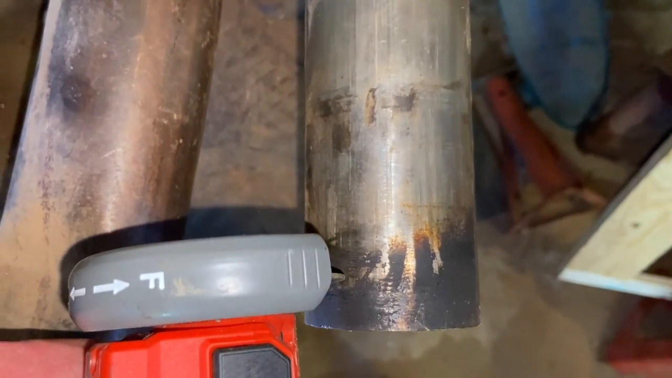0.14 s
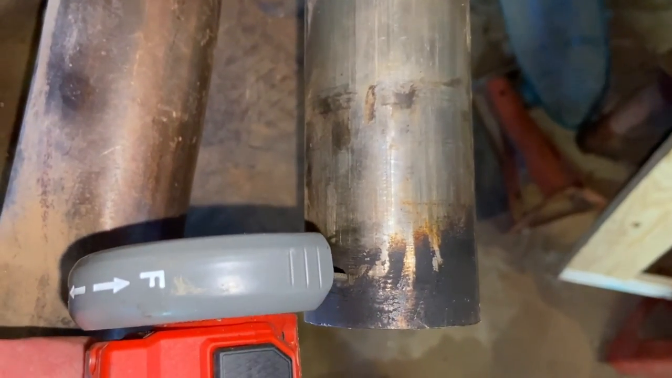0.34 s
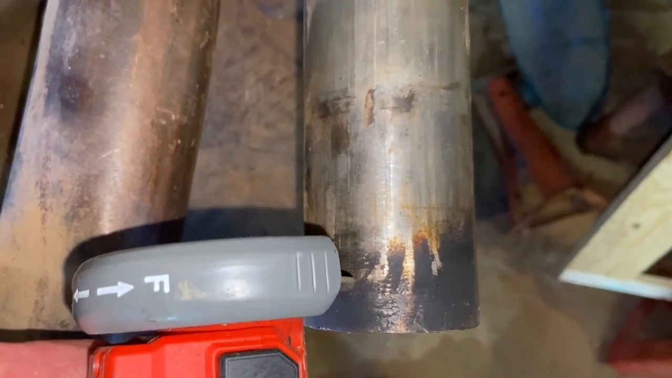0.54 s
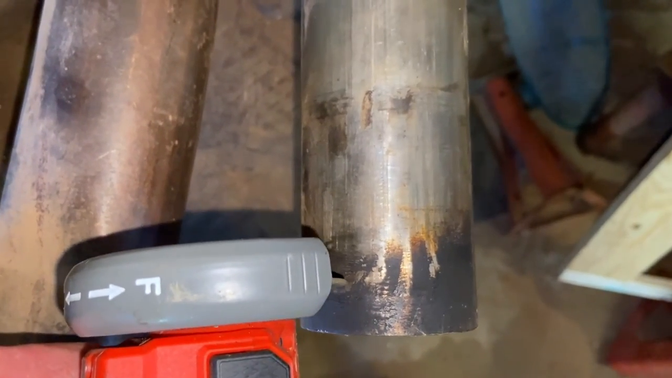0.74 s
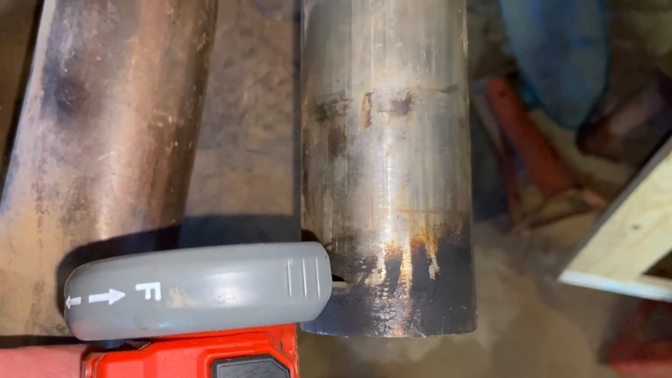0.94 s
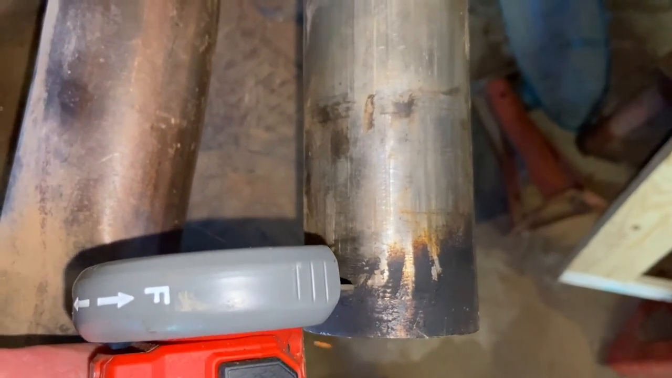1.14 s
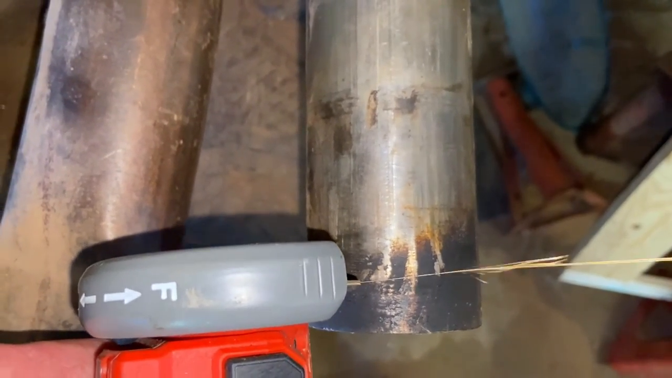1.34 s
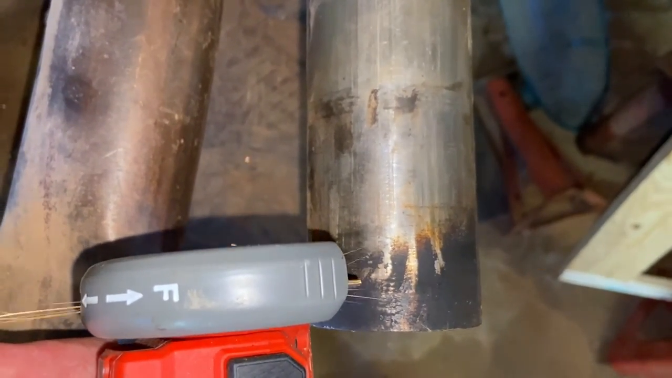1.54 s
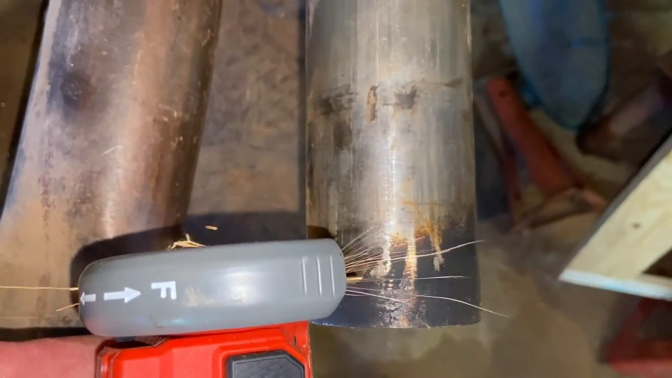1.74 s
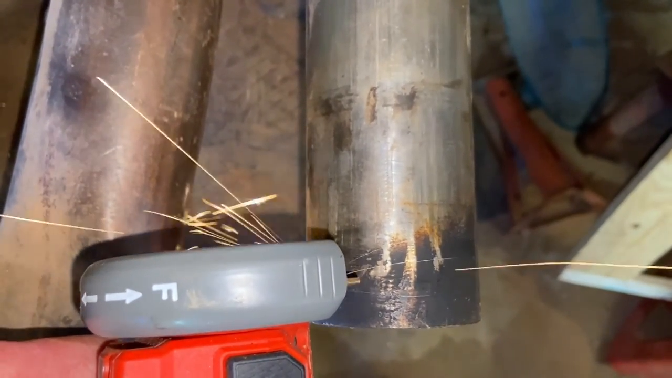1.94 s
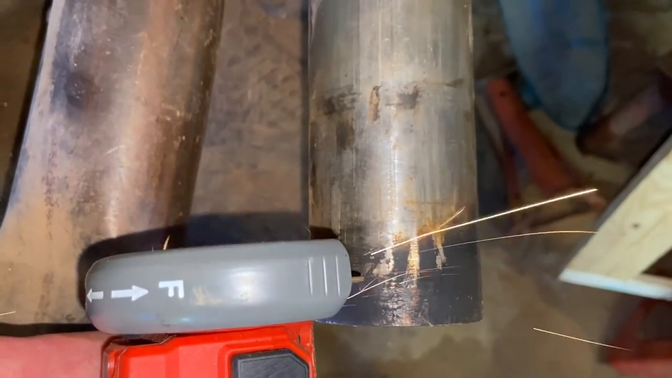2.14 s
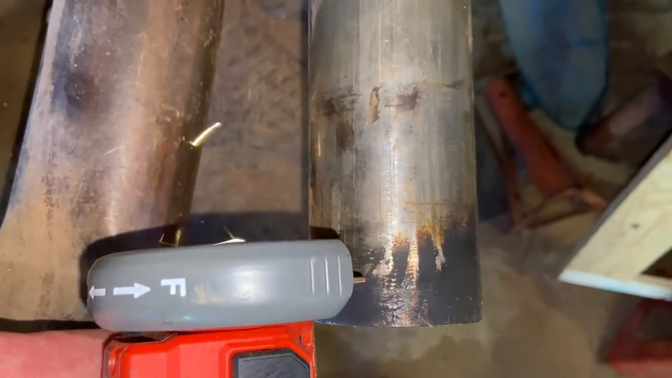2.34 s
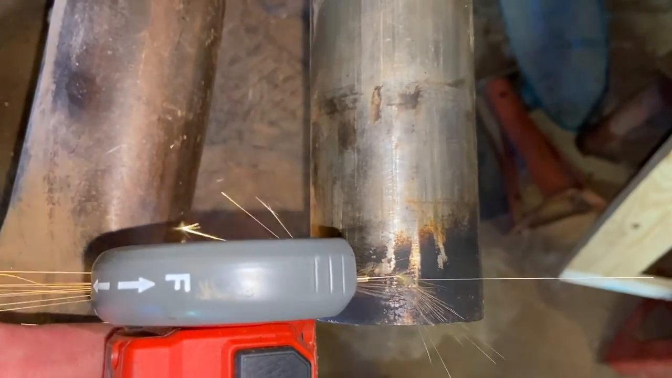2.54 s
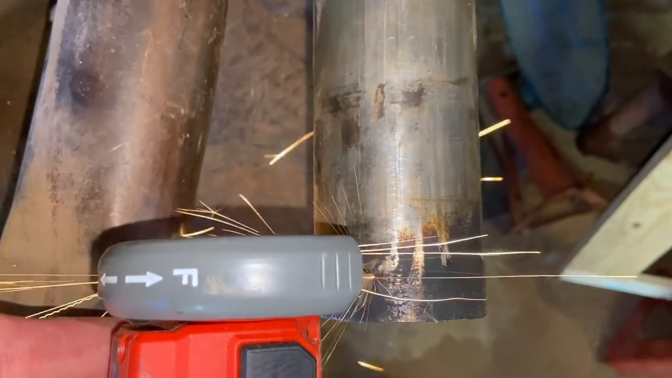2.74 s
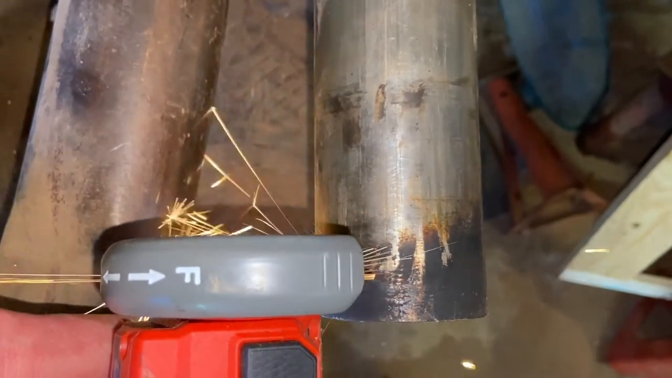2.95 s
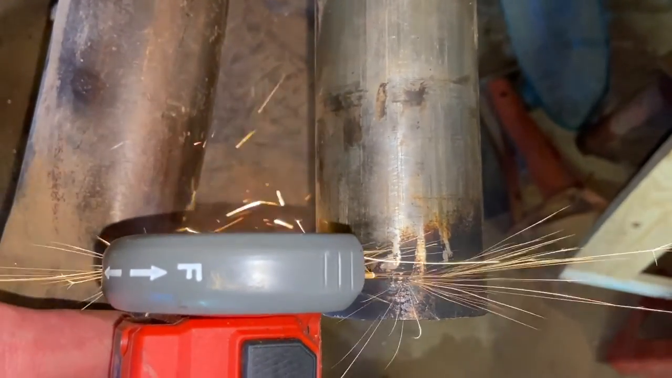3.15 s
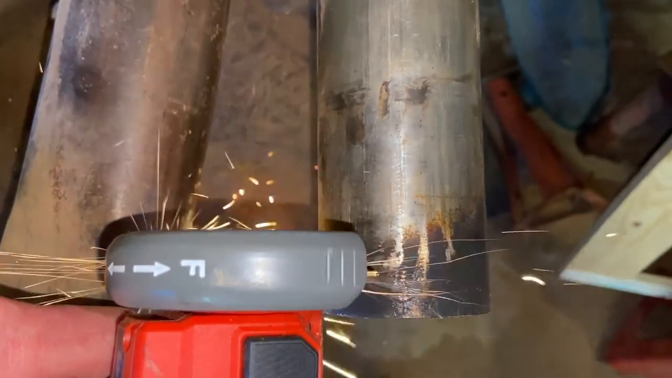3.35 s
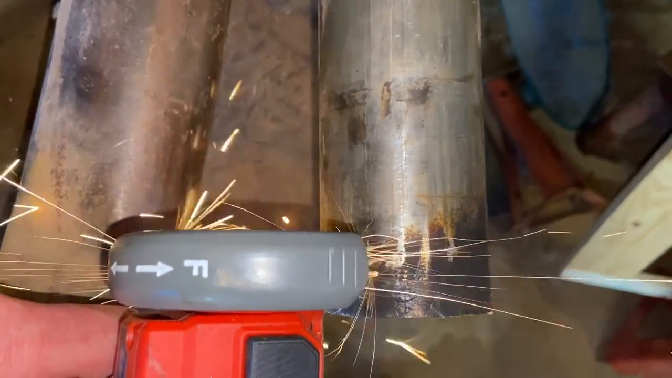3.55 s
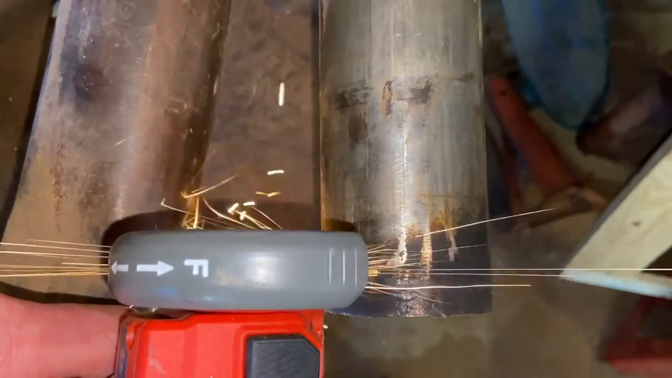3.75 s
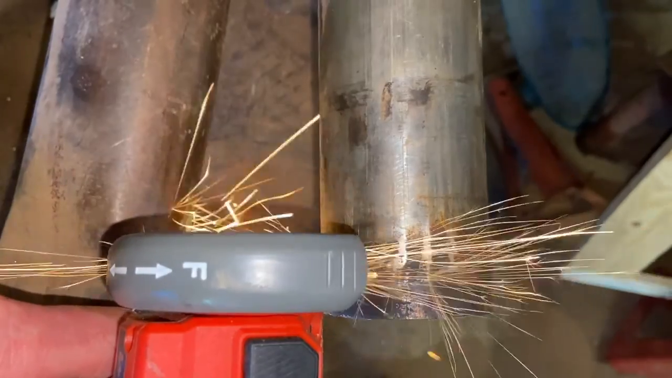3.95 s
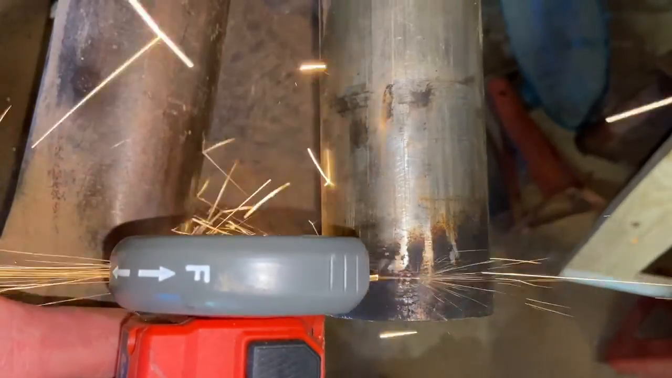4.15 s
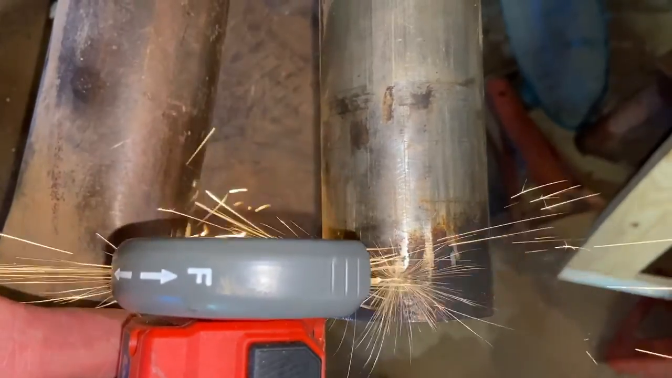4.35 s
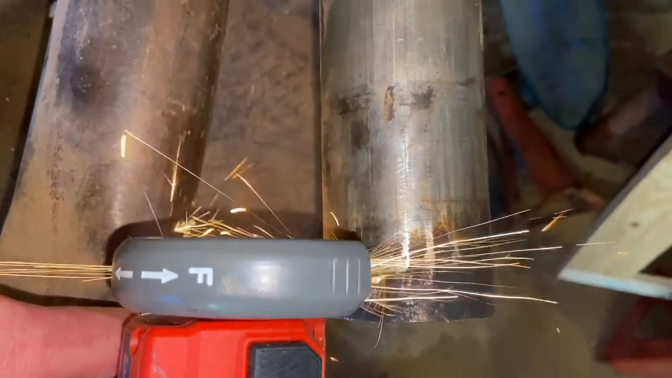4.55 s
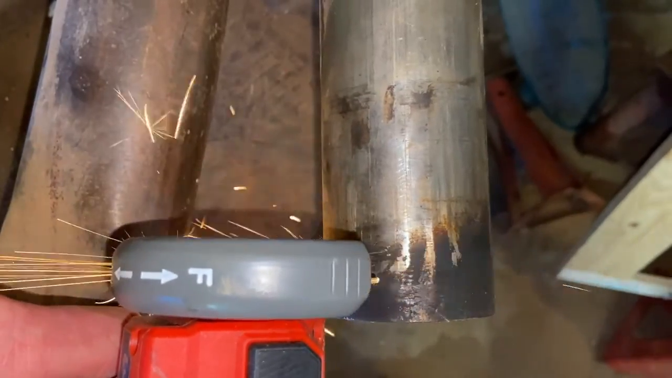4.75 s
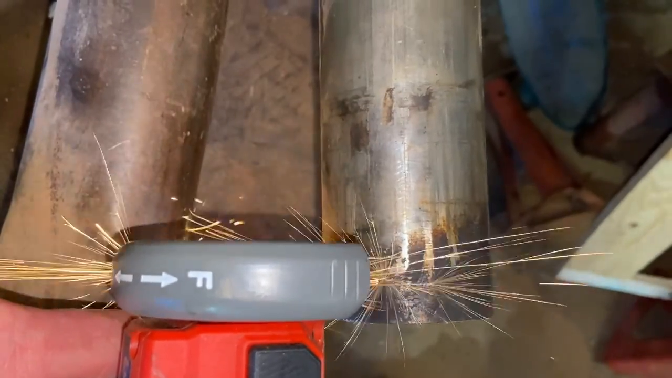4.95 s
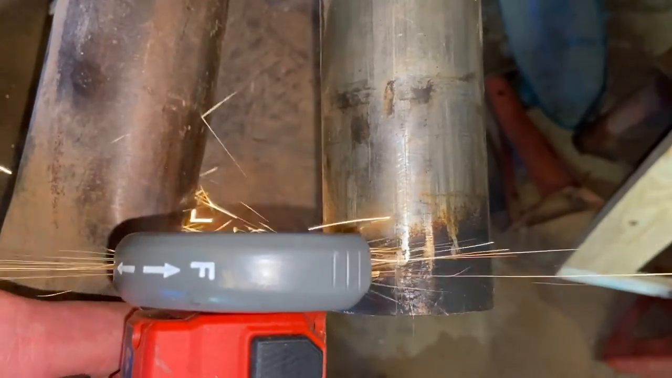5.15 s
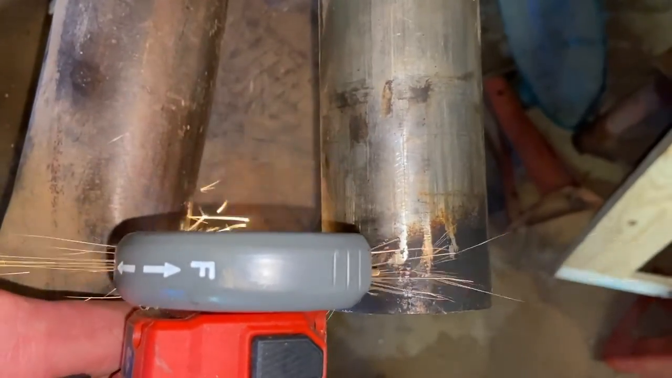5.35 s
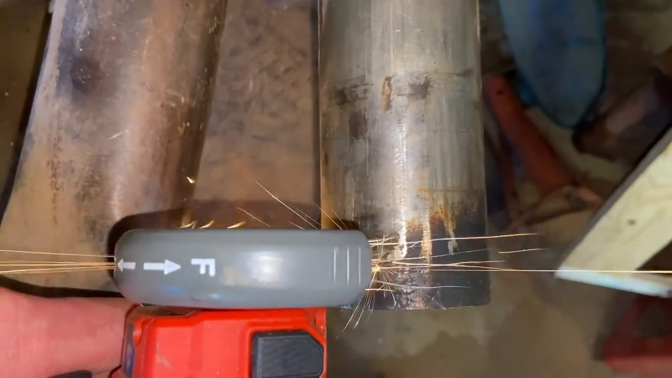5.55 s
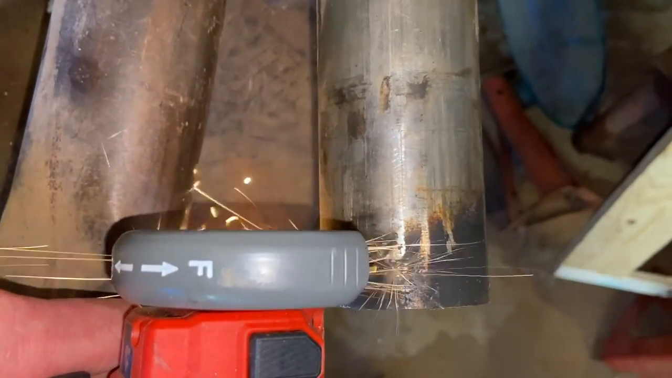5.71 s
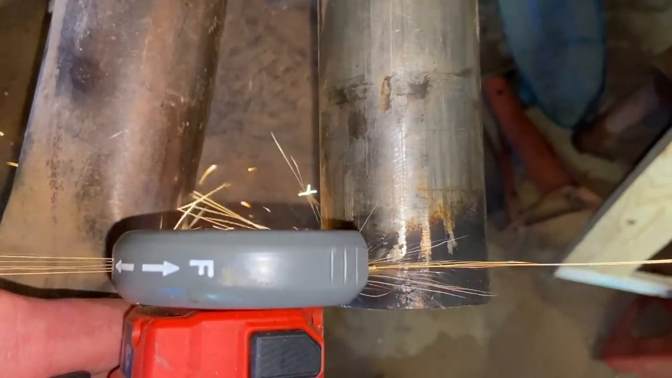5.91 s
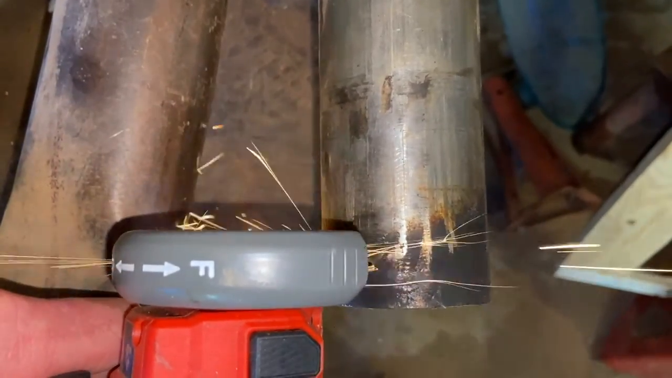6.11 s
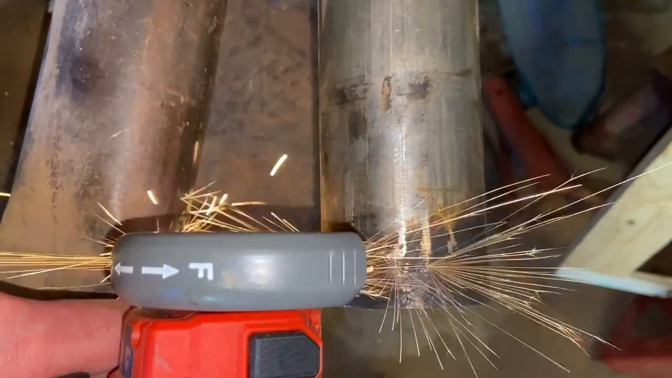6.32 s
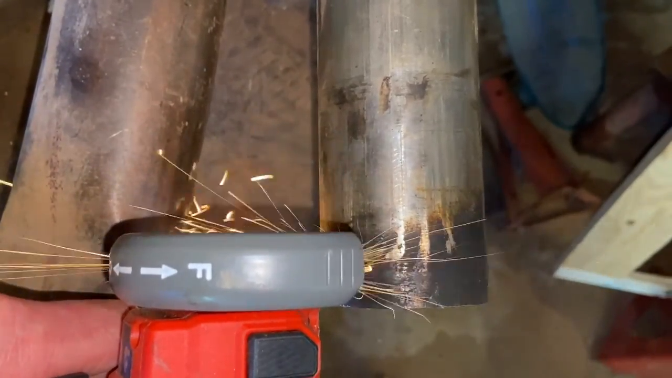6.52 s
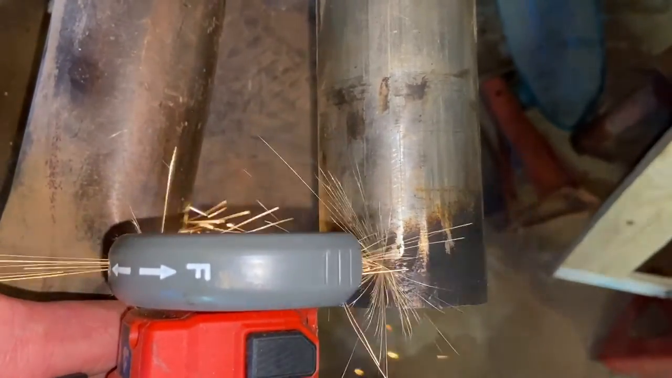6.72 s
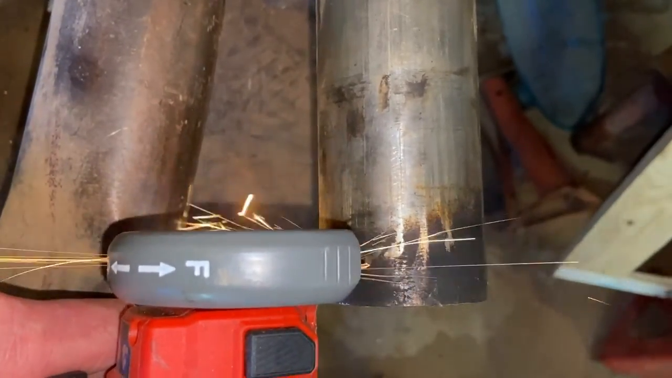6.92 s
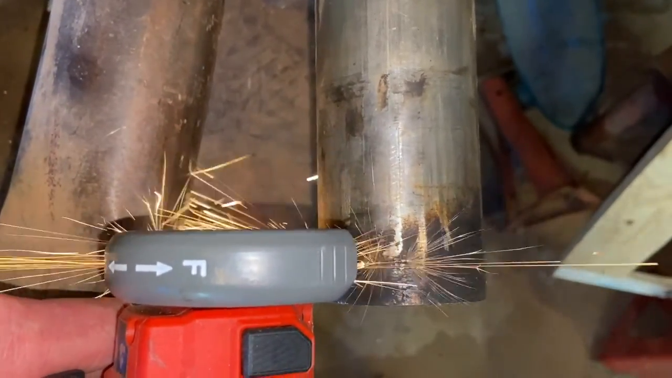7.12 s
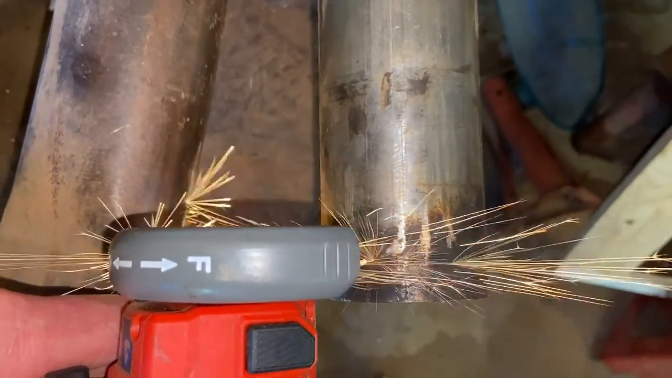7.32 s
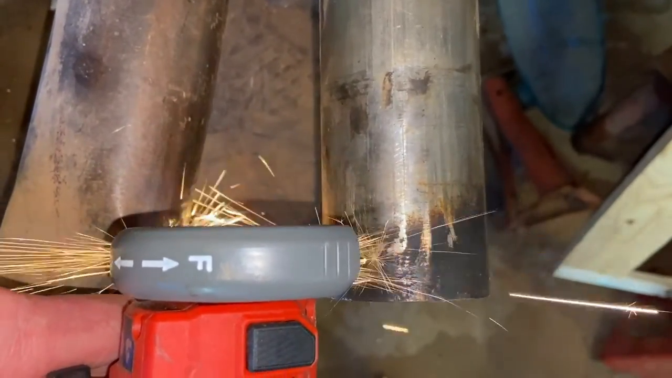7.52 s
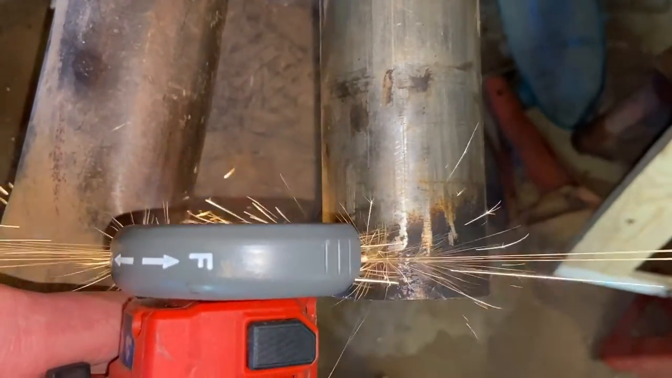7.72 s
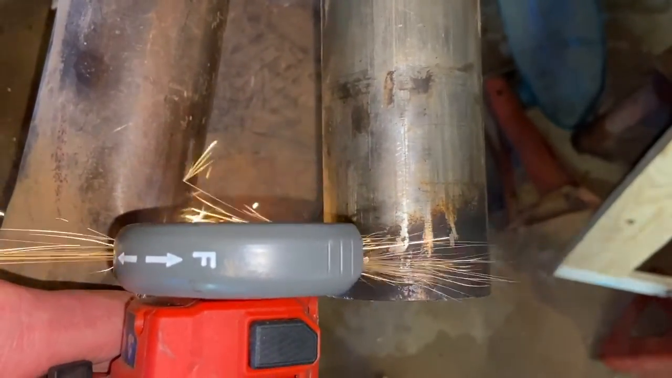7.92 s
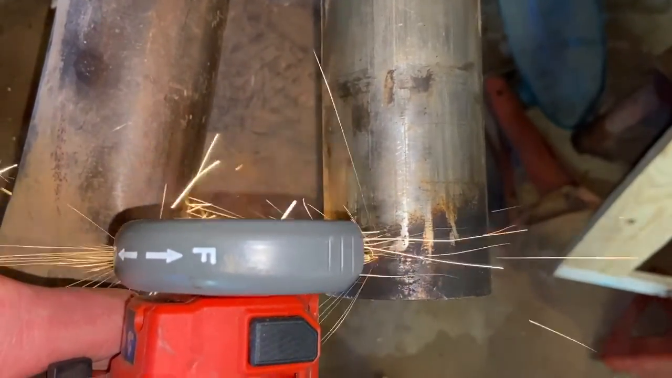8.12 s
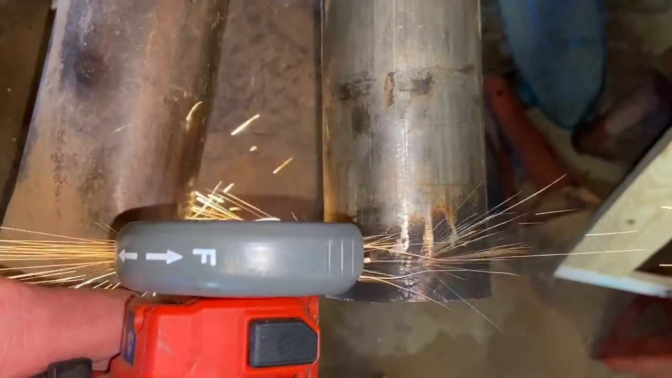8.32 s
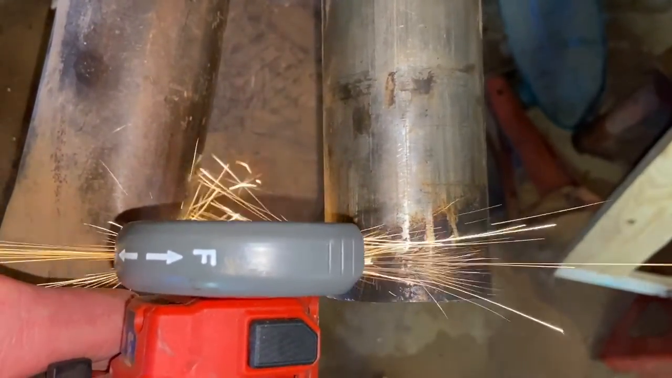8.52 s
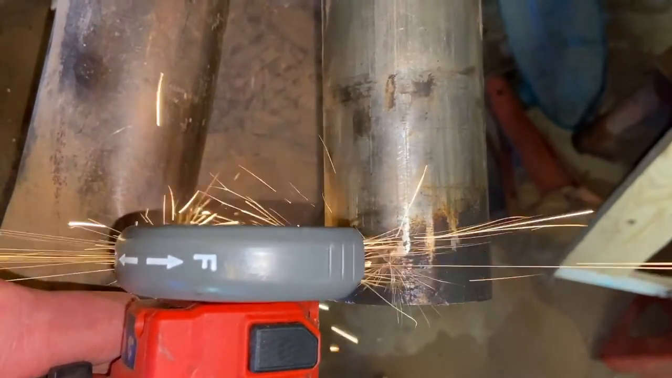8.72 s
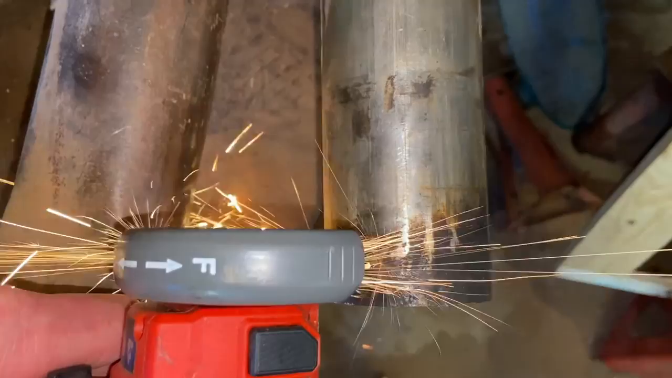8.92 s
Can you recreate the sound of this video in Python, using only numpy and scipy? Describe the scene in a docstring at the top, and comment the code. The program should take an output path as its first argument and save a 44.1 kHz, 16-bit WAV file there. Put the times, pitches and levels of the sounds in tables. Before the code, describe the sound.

A cordless cut-off tool chirps and rattles to life against a steel pipe, then whines into a bright buzzing, hissing cut with ringing squeals.

```python
"""A whistle and a rattle lead into a bright buzz with hissing grit and clear singing tones from a steel pipe.
A cordless cut-off tool starts with its wheel resting on the pipe in a vise, then speeds up and cuts.
The buzz adds up multiples of the wheel's turning speed, which sags under load; the grit is coloured noise.
Narrow resonances and sine tones make the pipe ring; a motor, a fan, rumble and a short room tail join in."""
import sys
import numpy as np
from scipy import signal
from scipy.fft import rfft, irfft, next_fast_len
from scipy.io import wavfile

SR = 44100
rng = np.random.default_rng(int(sys.argv[2]) if len(sys.argv) > 2 else 0)


def dump_mix(stems):
    """Bounce the given channels to the path in sys.argv[1] as a 16-bit WAV at rate SR."""
    frames = np.atleast_2d(stems).T  # one column per channel
    limited = np.clip(frames, -1, 1)  # hard clip at full scale
    pcm = np.round(limited * 32767).astype(np.int16)
    wavfile.write(sys.argv[1], SR, pcm)


N = 395577

# Table levels are starting levels: later gains and resonances still act on them.
# Running speed under load. Each row: time in seconds, speed in turns per second.
RUNNING_SPEED = [(0.8, 291.4), (1.0, 295), (1.13, 289.3), (1.42, 288.2), (1.74, 285.6), (1.98, 280.3),
                 (2.32, 276.9), (2.79, 274.2), (3.3, 273.5), (3.5, 274.8), (4.17, 272.8), (4.52, 274),
                 (4.85, 281.4), (5.05, 283.8), (5.26, 281.9), (5.44, 283.9), (5.66, 282), (6.03, 279.5),
                 (6.18, 283.0), (6.62, 278), (6.87, 282.4), (7.07, 280.9), (7.58, 284.5), (7.81, 278.2),
                 (8.13, 275.4), (8.35, 276.6), (8.56, 272.8), (8.75, 275.4), (8.97, 272.2)]
# How hard the wheel rubs. Each row: time in seconds, buzz in dB, treble against the buzz in dB.
RUBBING = [(0.88, -29.5, -2.5), (1.25, -26, -2), (1.5, -28, -1.3), (1.95, -26.5, -5.5), (2.3, -30.5, -1.5),
           (2.9, -29, -2), (3.5, -27.5, -5), (3.7, -29, -2.5), (4.4, -28.5, -2.5), (4.72, -29, -2.5),
           (4.89, -33.5, -2), (5.05, -29, -2.5), (5.45, -28, -2.5), (5.68, -28.5, -2), (6.02, -30.5, -2.5),
           (6.15, -33, -5), (6.55, -32, -3.5), (6.9, -33, -4.5), (7.3, -29, 0.5), (7.6, -30.5, 0),
           (7.9, -30.5, -3.5), (8.15, -31.0, -1), (8.6, -31, -1.5), (8.97, -28.5, -0.5)]
# The wheel knocks on the pipe as it starts. Each row: time in seconds, level in dB.
KNOCKS = [(0.242, -15.5), (0.255, -11), (0.273, -9.5), (0.319, -23), (0.454, -25)]
# Motor tones. Each row: multiple of the turning speed, level in dB.
MOTOR_ORDERS = [(1, -60), (2, -57.5), (4, -50), (5, -53), (8, -52), (11, -54.5), (16, -52.5), (20, -55),
                (24, -69), (32, -55.5)]
# Pipe resonances. Each row: pitch in Hz, width in Hz, lift in dB.
PIPE_MODES = [(2795, 26, 17.5), (5316, 17.4, 18)]
# Resonances of the motor housing. Each row: pitch in Hz, width in Hz, lift in dB.
HOUSING_MODES = [(3220, 32, 24), (3790, 640, 27)]
# One stroke of the wheel. Each entry: level in dB against the buzz, for multiples 1, 2, 3.. of the speed.
STROKE_LEVELS = [-32, -35, -34.5, -28, -22, -23.5, -24.5, -23, -26, -20, -20, -17, -19, -16, -25.5, -12,
                 -10, -9, -10, -8.5, -9.5, -9, -16, -11.5, -16, -13.5, -15, -15, -16.5, -17, -16, -12, -24,
                 -20.5, -18.5, -19.5, -18.5, -25.5, -22.5, -21, -18.5, -16, -20.5, -18.5, -18, -22, -14.5,
                 -15, -15, -16, -23, -20, -18, -14, -13, -13, -14]
# Colour of the grit hiss. Each row: frequency in Hz, relative level in dB per Hz.
GRIT_COLOUR = [(300, -10), (1400, -5.5), (2400, -13.5), (3600, 4), (4300, 1), (5500, 3.5), (7000, -1.5),
               (8000, -1.5), (9800, -2.5), (11000, -10), (15600, -22)]
# Colour of the skidding scrape. Each row: frequency in Hz, relative level in dB per Hz.
SCRAPE_COLOUR = [(150, -34), (700, -10), (2400, -13), (3700, 5), (4500, -3.5), (5800, 7), (6800, -3),
                 (8200, 0), (9800, -8.5), (11000, -11), (15600, -3.5)]
# Colour of the starting thud. Each row: frequency in Hz, relative level in dB per Hz.
THUD_COLOUR = [(50, -33), (130, 2.5), (250, 2), (500, 3.5), (1500, 3.5), (3000, -1.5), (8000, -27)]
# Colour of the handling rumble. Each row: frequency in Hz, relative level in dB per Hz.
RUMBLE_COLOUR = [(20, -19), (50, 5.5), (75, 3.5), (110, -13), (250, -24), (1000, -49)]
# Colour of the room air. Each row: frequency in Hz, relative level in dB per Hz.
AIR_COLOUR = [(30, -13), (150, -4.5), (900, -8), (3000, -21), (16000, -41)]
# Timing at two microphone ports. Each row: frequency in Hz, left's lead in radians.
PORT_PHASE = [(0, -1), (550, 1.76), (1100, 1.32), (1400, 1.5), (1950, 1.48), (2250, 4), (2800, 2.5),
              (3050, 3), (3600, 0.5), (4150, 0.54), (4400, 0), (4750, 1.41), (6100, 1.61), (7100, -0.35),
              (9150, -3), (10600, -6), (11400, -6.5), (13300, -9.5), (15200, -12)]
# Balance of the two ports. Each row: frequency in Hz, left minus right in dB.
PORT_BALANCE = [(300, -0.5), (600, 7), (1300, 2), (2400, 4), (5300, 2), (6200, 5.5), (8000, 0), (15000, 0)]
# How alike noise is in the two channels. Each row: frequency in Hz, likeness (1 is identical).
LIKENESS = [(60, 0.96), (300, 0.93), (700, 0.21), (3000, 0.22), (8000, 0.99), (15000, 0.87)]
# Resonances of wheel, guard and vise. Each row: pitch in Hz, width in Hz, lift in dB.
GUARD_MODES = [(1160, 16, -2.5), (2017, 37, 2.5), (2320, 26, 1.5), (2512, 47, 14), (3030, 18, 3),
               (3230, 15.4, 13.5), (4827, 51, -4), (5526, 72, 1.5), (6025, 50, 6.5), (7110, 60, 3),
               (7790, 150, 8.5), (8510, 30.8, 22.5), (9590, 23, 2), (9826, 77, 6), (9955, 142, 12.5),
               (10940, 93, 8.5), (12430, 53, 21), (12400, 45, 8)]
# Squeal of the pipe under the skidding wheel. Each row: pitch in Hz, level in dB against the skid.
SQUEAL_TONES = [(1005, -15), (2802, -4), (5315, -5), (12420, 0.5), (15640, -13)]
# Colour of the cooling fan's rush. Each row: frequency in Hz, relative level in dB per Hz.
FAN_COLOUR = [(100, -25), (220, -10), (280, 3), (360, -13), (700, -6), (1400, -14), (3000, -39)]
# The wheel bites and throws more grit. Each row: middle in seconds, length in seconds, grit lift in dB.
BITES = [(0.9, 0.15, 9), (1.099, 0.17, 11), (1.3, 0.4, 3), (2.33, 0.19, 5), (3.76, 0.23, 7),
         (4.172, 0.18, 6), (4.566, 0.33, 9.5)]
# The wheel grips and the pipe sings. Each row: middle in seconds, length in seconds, mode pitch in Hz,
# level in dB, left minus right in dB.
SINGS = [(1.964, 0.081, 2795, -26.5, 1.5), (2.01, 0.16, 5315, -11, -0.5), (2.056, 0.091, 2795, -16, -10),
         (2.172, 0.053, 5315, -21, 0), (2.214, 0.11, 5560, -28, 0), (2.234, 0.062, 2795, -22.5, -0.5),
         (2.287, 0.032, 5315, -21, 0), (2.41, 0.04, 5560, -24, 0), (2.43, 0.16, 2795, -28, 0),
         (4.77, 0.12, 5560, -21, 5), (4.78, 0.068, 2795, -21, -1), (4.797, 0.09, 5315, -12.5, 2),
         (5.7, 0.062, 5315, -19.5, 9), (5.736, 0.14, 2795, -22.5, -1), (5.825, 0.094, 5315, -18, 9),
         (5.93, 0.063, 5315, -16, 9), (5.913, 0.041, 2795, -22, -1), (6.04, 0.1, 5315, -15, 10),
         (6.46, 0.15, 2795, -27, 3.5), (6.465, 0.19, 5315, -25.5, 1), (6.587, 0.15, 5315, -22, 9),
         (6.632, 0.048, 2795, -24, -13), (6.712, 0.12, 5315, -17, 7), (7.05, 0.8, 2795, -38, 5),
         (7.837, .11, 5315, -16.5, -2)]
# Two whistle bursts of the motor drive. Each row: start in seconds, length in seconds, level in dB.
WHISTLES = [(.202, 0.034, -4), (0.246, 0.01, -18)]
# The hand bumps the microphone. Each row: middle in seconds, length in seconds, level in dB.
BUMPS = [(0.074, 0.4, -51.5), (2.18, 0.26, -67), (3.678, 0.27, -61), (6.07, 0.07, -56), (6.78, 0.092, -65),
         (7.92, 0.14, -50)]
# Low resonances of the tool's body. Each row: pitch in Hz, width in Hz, lift in dB.
BODY_MODES = [(170, 54, 4), (495, 110, 8), (910, 130, 2)]
# Buzz tones that the motor keeps steady. Each entry: multiple of the turning speed.
STEADY_ORDERS = (16, 20)
# Pipe tones at the first deep bite. Each row: middle in seconds, length in seconds, pitch in Hz, level in dB.
FIRST_RING = [(1.102, 0.062, 5330, -20.5), (1.107, 0.05, 2790, -26)]

TIME = np.arange(N) / SR
COARSE_TIME = TIME[::40]  # a coarse clock for slow swells
FFT_SIZE = next_fast_len(N + SR // 2)
FREQS_HZ = np.maximum(np.fft.rfftfreq(FFT_SIZE, 1 / SR), 1)
# The torque comes on first; the rotor breaks free a moment later and spins up.
START_S, ROTOR_S, SPIN_UP_S = 0.2185, .235, .5
SPIN_UP_POWER, GOVERNOR_KNEE = 1.05, 14  # power of the rise, sharpness of the levelling off
RIDE_S, SETTLE_S = 0.69, 0.18  # the wheel starts to ride the pipe, and takes this long to settle
WOBBLE_HZ, PUMP_DB = 8.7, 3.0  # wheel wobble in the cut, and how far it pumps the lowest pipe mode
GRIT_DB, ROUGH_DB = -19.5, -14.5  # grit added to its level curve; roughness against the buzz
# Throb of the buzz: depth, how much the depth varies (share), straying from the wobble's beat
THROB_DB, THROB_VARIES, THROB_STRAY_RAD = 2.2, .6, 1.6
SLIP_RAD = .0028  # how early or late a stroke comes, in radians of a turn
ROOM_T60_S = .45
CUTOFF_HZ = 15780


def from_db(db):
    """Turn decibels into gain."""
    return np.exp(np.asarray(db) * (np.log(10) / 20))


def rms_one(x):
    """Scale to unit power."""
    return x / np.sqrt(np.mean(x ** 2) + 1e-20)


def in_time(rows):
    """Read each column of a table at every sample."""
    s, *columns = np.transpose(rows)
    return [np.interp(TIME, s, column) for column in columns]


def at_hz(points, hz):
    """Read a spectrum along a log-frequency axis."""
    at, values = np.transpose(points)
    return np.interp(np.log(hz), np.log(at), values)


def drift(rate, t=TIME):
    """Smooth random wandering of spread about 1, with about rate changes a second."""
    fine = signal.resample_poly(rng.standard_normal(2000), up=8, down=1)
    return np.interp(t * rate * 8, np.arange(len(fine)), fine)


def filtered(x, response):
    """Apply a frequency response."""
    return irfft(rfft(x, FFT_SIZE) * response, FFT_SIZE)[..., :N]


def resonate(x, modes):
    """Add the ringing of each mode to the direct sound; a narrow mode rings longer."""
    out = x.copy()
    for hz, width, lift_db in modes:
        radius = np.exp(-np.pi * width / SR)
        feed = (1 - radius ** 2) / 2 * np.array([1, 0, -1])
        feedback = [1, -2 * radius * np.cos(2 * np.pi * hz / SR), radius ** 2]
        out += from_db(lift_db) * signal.lfilter(feed, feedback, x + 1e-18)
    return out


def noise(colour):
    """Coloured stereo noise, partly alike in the two channels, at unit power."""
    mid, side = rfft(rng.standard_normal((2, FFT_SIZE)))
    alike = np.clip(at_hz(LIKENESS, FREQS_HZ), -1, 1)
    pair = np.sqrt(1 + alike) * mid + np.sqrt(1 - alike) * side * [[1], [-1]]
    return rms_one(irfft(pair * from_db(at_hz(colour, FREQS_HZ)), FFT_SIZE)[:, :N])


def ramp(start_s, rise_s):
    """Rise from 0 to 1 and stay there."""
    return np.clip((TIME - start_s) / rise_s, 0, 1)


def envelope(start_s, attack_s, length_s, release_t60):
    """Rise, hold until length_s after the start, then fall 60 dB every release_t60 seconds."""
    release = np.clip((TIME - start_s - length_s) / release_t60, 0, 2)
    return ramp(start_s, attack_s) * from_db(-60 * release)


def swell(middle_s, length_s):
    """A bell of height 1, length_s wide at half its height."""
    return .5 ** np.minimum((2 * (TIME - middle_s) / length_s) ** 2, 20)


def background(air_db=-69, rumble_db=-71, tone_hz=885, tone_db=-67):
    """Handling rumble swells at each bump, over room air and a faint steady tone."""
    tone = from_db(tone_db) * np.sin(2 * np.pi * tone_hz * TIME)
    bumps = sum(from_db(db) * swell(s, length) for s, length, db in BUMPS)
    rumble = (from_db(rumble_db) + bumps) * noise(RUMBLE_COLOUR)
    return rumble + from_db(air_db) * noise(AIR_COLOUR) + tone


def whistle(whistle_hz=7790, attack_s=0.0011, quiet_db=-18, growth_db=6, release_t60=0.052,
            tail_db=-8, tail_t60=0.1, octave_db=-17, click_db=-26, click_t60=0.015):
    """The drive clicks on; its whistle grows as the rotor breaks free, and the last burst rings on."""
    (first_s, first_length, _), (last_s, last_length, last_db) = WHISTLES
    bursts = sum(from_db(db) * envelope(s, attack_s, length, release_t60) for s, length, db in WHISTLES)
    growth = from_db(quiet_db + growth_db * ramp(first_s, first_length))
    tail = from_db(last_db + tail_db) * envelope(last_s, attack_s, 2 * last_length, tail_t60)
    phase = 2 * np.pi * whistle_hz * TIME
    tone = np.sin(phase) + from_db(octave_db) * np.sin(2 * phase)
    click = from_db(click_db) * envelope(first_s, 1 / SR, 0, click_t60) * noise(SCRAPE_COLOUR)
    return np.sqrt(2) * (bursts * growth + tail) * tone + click


def jolt(peak_db=-25.0, attack_s=0.021, length_s=0.057, release_t60=0.22):
    """The starting torque jolts the housing: a short thud of low noise."""
    return from_db(peak_db) * envelope(START_S, attack_s, length_s, release_t60) * noise(THUD_COLOUR)


def wheel_speed(jitter=0.00101, hunting=0.000403):
    """Turns per second: a power-law spin-up, then the speed the load allows, never quite steady."""
    free = (np.maximum(TIME - ROTOR_S, 0) / SPIN_UP_S) ** SPIN_UP_POWER
    governed = free / (1 + free ** GOVERNOR_KNEE) ** (1 / GOVERNOR_KNEE)
    unsteady = 1 + jitter * drift(40) + hunting * drift(16)
    return in_time(RUNNING_SPEED)[0] * governed * unsteady


def motor(angle, speed, low_hz=3050, top_hz=4800, free_db=-6.5, speed_power=0.71, torque_db=5,
          easing_s=0.67, easing_length_s=0.13, loaded_s=1.0, loading_s=0.079, loaded_db=-15):
    """Motor tones sweep up through body and housing resonances; torque lifts them, cutting lowers them."""
    hum = sum(from_db(db) * np.sin(k * angle) for k, db in MOTOR_ORDERS if k < 10)
    hum = resonate(hum, BODY_MODES)
    whine = sum(from_db(db) * np.sin(k * angle) for k, db in MOTOR_ORDERS if k >= 10)
    band = signal.butter(3, [low_hz, top_hz], "band", fs=SR, output="sos")
    whine = signal.sosfilt(band, resonate(whine, HOUSING_MODES))
    starting_db = torque_db * (1 - ramp(easing_s, easing_length_s))
    effort_db = free_db + starting_db + loaded_db * ramp(loaded_s, loading_s)
    return np.sqrt(2) * (speed / speed.max()) ** speed_power * from_db(effort_db) * (hum + whine)


def fan(speed, full_db=-58):
    """The cooling fan's rush grows with the square of the motor's speed."""
    return from_db(full_db) * (speed / speed.max()) ** 2 * noise(FAN_COLOUR)


def skid_force(grab_s=0.246, attack_s=0.05, grab_db=-19, grab_t60=0.44,
               slide_db=-24, slide_s=0.49, release_t60=0.82):
    """The slow wheel grabs the pipe hard, eases to a steady slide, then lets go."""
    grab = from_db(grab_db) * envelope(grab_s, attack_s, attack_s, grab_t60)
    return grab + from_db(slide_db) * envelope(START_S, attack_s, slide_s, release_t60)


def skid(angle, gain_db=-5, stroke_db=2.0, knock_s=0.0032, dull_hz=7500, brighten_s=0.18):
    """The wheel scrapes and knocks on the pipe as noise pulsing with each turn; its treble fades in."""
    force = skid_force() * from_db(gain_db + stroke_db * np.cos(angle))
    for s, db in KNOCKS:
        force = force + from_db(db) * (TIME >= s) * np.exp(-np.abs(TIME - s) / knock_s)
    scrape = noise(SCRAPE_COLOUR)
    dull = filtered(scrape, 1 / (1 + (FREQS_HZ / dull_hz) ** 4))
    return force * (dull + ramp(START_S, brighten_s) * (scrape - dull))


def squeal(waver_db=4.5, slip_rad=0.79, start_s=0.248, attack_s=0.023,
           easy_hz=6000, slow_db=-28, low_hz=2000, fast_db=-12):
    """Stick and slip keep wavering pipe tones going; high ones grow during spin-up, the lowest fades."""
    too_slow_db = slow_db * (1 - ramp(START_S, SPIN_UP_S))
    too_fast_db = fast_db * ramp(START_S, SPIN_UP_S)
    tones = np.zeros(N)
    for hz, tone_db in SQUEAL_TONES:
        spin_up_db = (hz > easy_hz) * too_slow_db + (hz < low_hz) * too_fast_db
        height = from_db(tone_db + spin_up_db + waver_db * drift(22.18))
        tones += height * np.sin(2 * np.pi * hz * TIME + slip_rad * drift(30.3))
    return np.sqrt(2) * ramp(start_s, attack_s) * skid_force() * tones


def first_ring():
    """The pipe's modes swell at their own pitch as the wheel first digs in."""
    tones = (from_db(db) * swell(s, length) * np.sin(2 * np.pi * hz * TIME)
             for s, length, hz, db in FIRST_RING)
    return np.sqrt(2) * sum(tones)


def wobble(t=TIME):
    """Phase of a wheel wobble in the cut; each call draws its own slight unevenness."""
    rate_hz = WOBBLE_HZ * (1 + 0.0743 * drift(1.487, t))
    return 2 * np.pi * np.cumsum(rate_hz) * t[1]  # t[1] is the time step


def pipe(contact, resting_db=3.0, cutting_db=0.0):
    """The contact rings the pipe, less once the wheel digs in; a wobble pumps the lowest mode."""
    dig_in_s, dig_in_length_s, _ = BITES[1]
    coupling_db = resting_db + (cutting_db - resting_db) * ramp(dig_in_s, dig_in_length_s)
    ring = squeal() + first_ring()
    pumped_db = PUMP_DB * np.cos(wobble())
    for modes, lift_db in ((PIPE_MODES[:1], pumped_db), (PIPE_MODES[1:], 0)):
        drive = contact * from_db(coupling_db + lift_db)
        ring = ring + resonate(drive, modes) - drive  # the ringing without the direct sound
    return ring


def cutting(grit_follows=0.64):
    """Levels of buzz, treble and grit: the grit partly follows the rubbing and flares at each bite."""
    buzz_db, treble_db = in_time(RUBBING)
    grit_db = buzz_db.mean() + grit_follows * (buzz_db - buzz_db.mean())
    flares_db = sum(db * swell(s, length) for s, length, db in BITES)
    return buzz_db, treble_db, grit_db + flares_db


def buzz(speed, angle, cut, wander_db=1.7):
    """One stroke a turn, each a hair early or late; a wobble makes all but the steady multiples throb."""
    buzz_db, treble_db = (np.interp(COARSE_TIME, TIME, column) for column in cut[:2])
    beat = wobble(COARSE_TIME)
    riding = np.interp(COARSE_TIME, TIME, ramp(RIDE_S, SETTLE_S))
    turn = ((angle + SLIP_RAD * drift(190)) % (2 * np.pi)).astype(np.float32)
    mean_speed, out = np.median(speed), np.zeros(N)
    for k, stroke_db in enumerate(STROKE_LEVELS, 1):
        # the treble setting fades in from 7500 to 10000 Hz
        treble_share = np.clip((k * mean_speed - 7500) / 2500, 0, 1)
        depth_db = THROB_DB * (1 + THROB_VARIES * drift(1.515, COARSE_TIME))
        throb_db = depth_db * np.cos(beat + THROB_STRAY_RAD * drift(2, COARSE_TIME))
        unsteady_db = (k not in STEADY_ORDERS) * (throb_db + wander_db * drift(24, COARSE_TIME))
        level = from_db(buzz_db + stroke_db + treble_share * treble_db + unsteady_db)
        height = riding * level * (1 + from_db(ROUGH_DB) * drift(130, COARSE_TIME))
        phase = k * turn + float(rng.uniform(0, 2 * np.pi))
        out += np.interp(TIME, COARSE_TIME, height) * np.sin(phase)
    return out


def grit(angle, grit_db, stroke_db=2.5, flicker_db=1):
    """Abrasive grains tear at the steel: flickering noise, loudest at the wheel's high spot."""
    level_db = grit_db + GRIT_DB + stroke_db * np.cos(angle) + flicker_db * drift(80)
    return noise(GRIT_COLOUR) * ramp(RIDE_S, SETTLE_S) * from_db(level_db)


def singing(angle, speed, waver_db=1.26, slip_rad=0.31):
    """As the wheel grips, the multiple of its speed nearest a pipe mode swells into a clear tone."""
    heights = {}
    for s, length, hz, db, pan_db in SINGS:
        k = round(hz / np.interp(s, TIME, speed))
        left_right = from_db([db + pan_db / 2, db - pan_db / 2])
        heights[k] = heights.get(k, 0) + np.outer(left_right, swell(s, length))
    tones = (height * from_db(waver_db * drift(25)) * np.sin(k * angle + slip_rad * drift(30))
             for k, height in heights.items())
    return np.sqrt(2) * sum(tones)


def ports(x):
    """Sound reaches the two microphone ports with unequal delay and strength."""
    half_lead = np.interp(FREQS_HZ, *np.transpose(PORT_PHASE)) / 2
    left = from_db(at_hz(PORT_BALANCE, FREQS_HZ) / 2) * np.exp(1j * half_lead)
    return filtered(x, np.array([left, 1 / left]))


def workshop(x, wet_db=-11, wall_hz=5000):
    """Bench and walls add a short, dull tail of fading noise, different in each channel."""
    t = TIME[:SR // 2]
    tail = rng.standard_normal((2, len(t))) * from_db(-60 * t / ROOM_T60_S) * (t > .003)
    tail = tail / np.sqrt(np.sum(tail ** 2) / 2)
    tail = signal.sosfilt(signal.butter(2, wall_hz, fs=SR, output="sos"), tail)
    return x + from_db(wet_db) * filtered(x, rfft(tail, FFT_SIZE))


def scene(buzz_gain_db=4.5):
    """Buzz, grit and skid excite the guard and pipe; the motor and the room add to them."""
    speed = wheel_speed()
    angle = 2 * np.pi * np.cumsum(speed) / SR
    cut = cutting()
    contact = from_db(buzz_gain_db) * buzz(speed, angle, cut) + grit(angle, cut[2]) + skid(angle)
    steel = resonate(contact, GUARD_MODES) + pipe(contact) + singing(angle, speed)
    tool = steel + motor(angle, speed) + whistle() + fan(speed) + jolt()
    return workshop(ports(tool)) + background()


def record(dry):
    """Peaks stop at full scale, then a steep filter removes the very top."""
    low_pass = signal.ellip(12, .1, 80, CUTOFF_HZ, fs=SR, output="sos")
    return signal.sosfilt(low_pass, np.clip(dry, -1, 1))


dry = scene()
out = record(dry)
dump_mix(out)
```